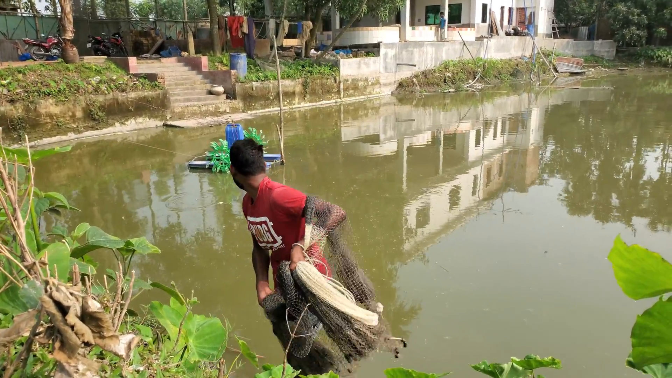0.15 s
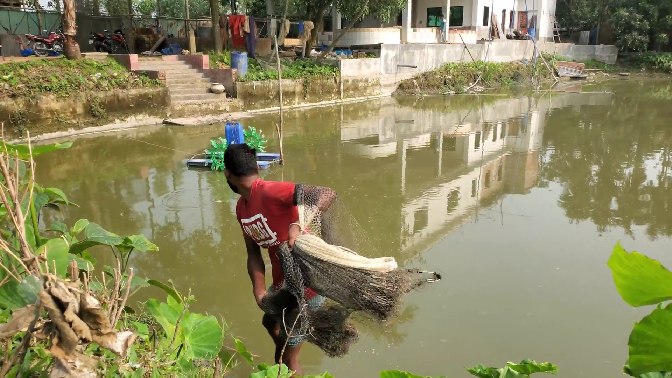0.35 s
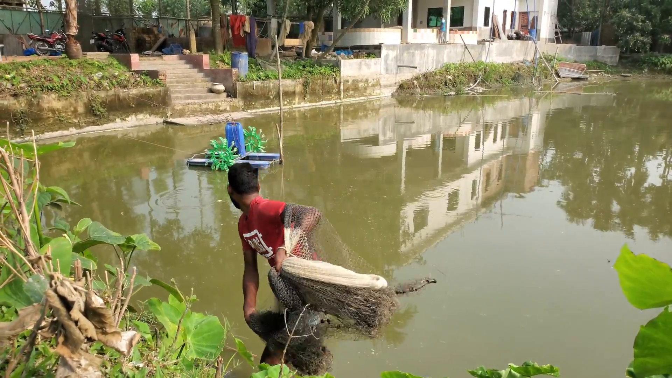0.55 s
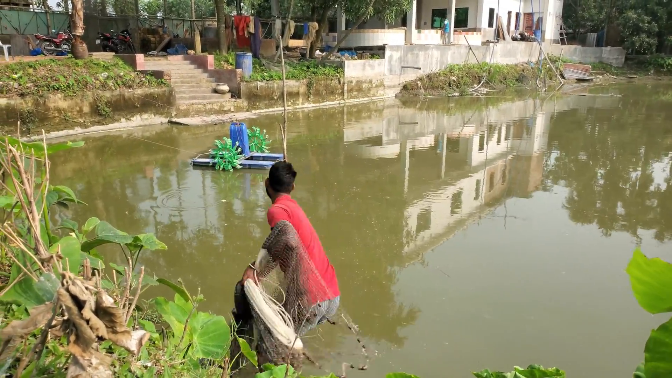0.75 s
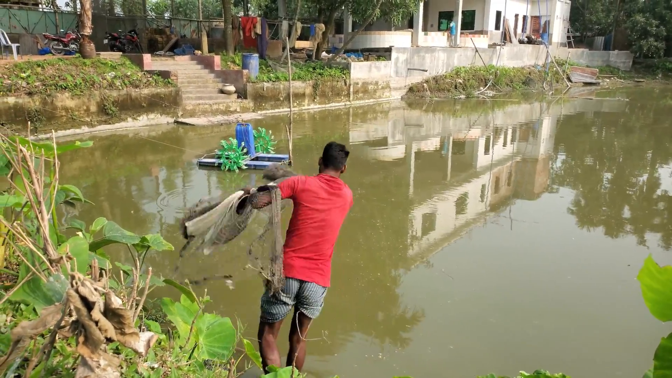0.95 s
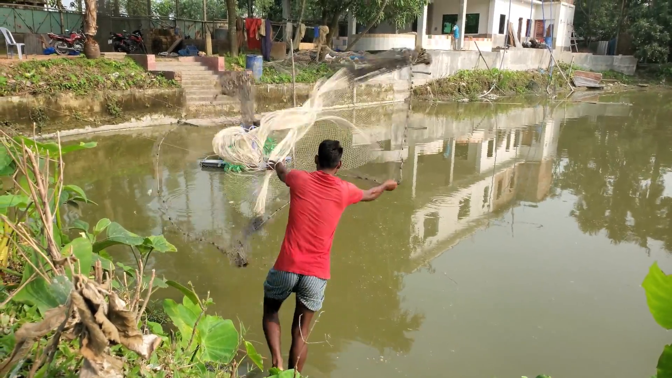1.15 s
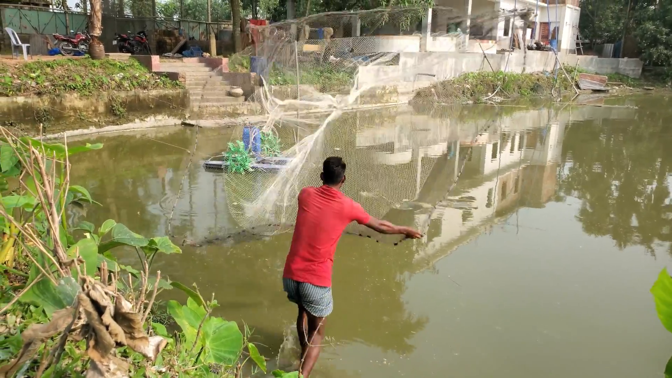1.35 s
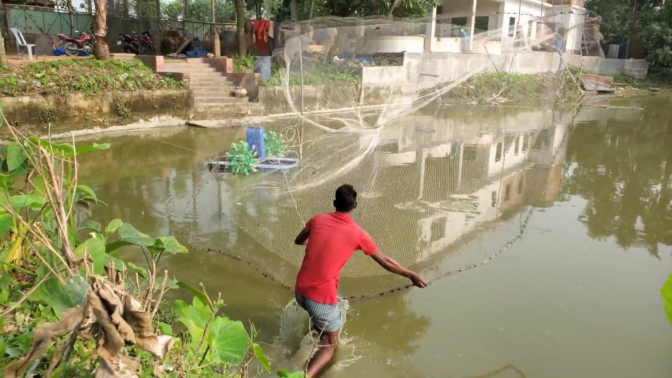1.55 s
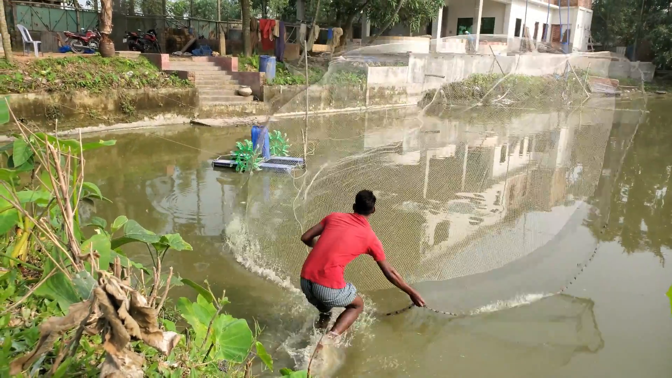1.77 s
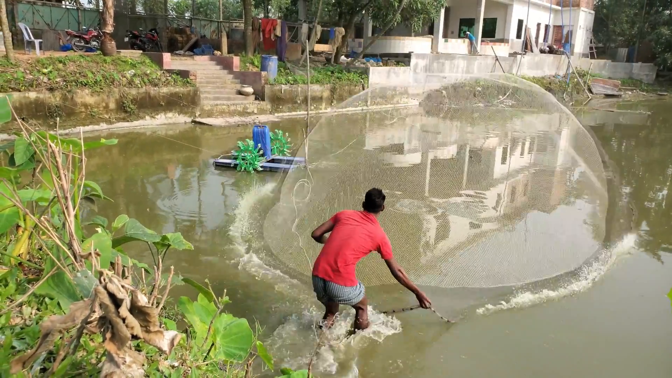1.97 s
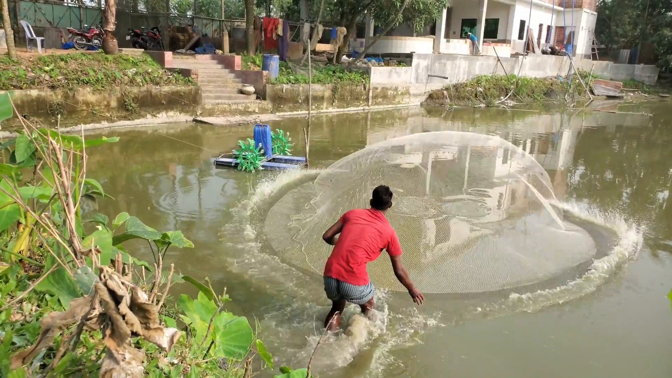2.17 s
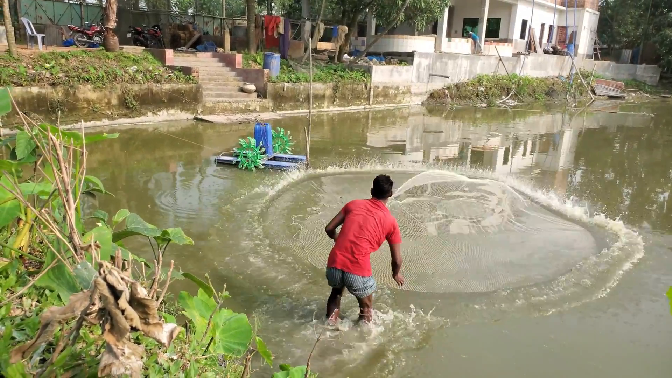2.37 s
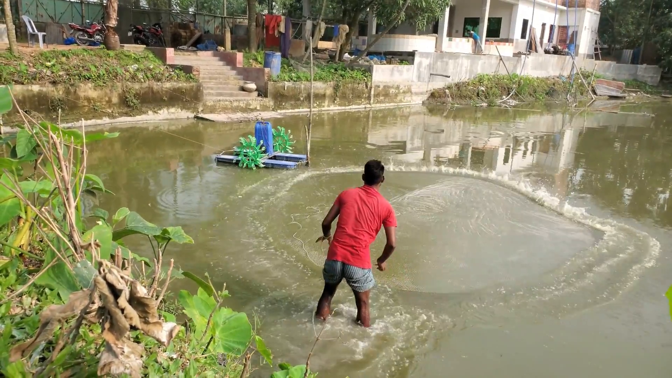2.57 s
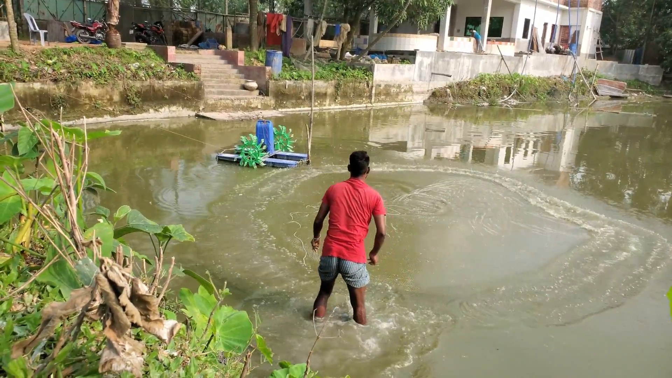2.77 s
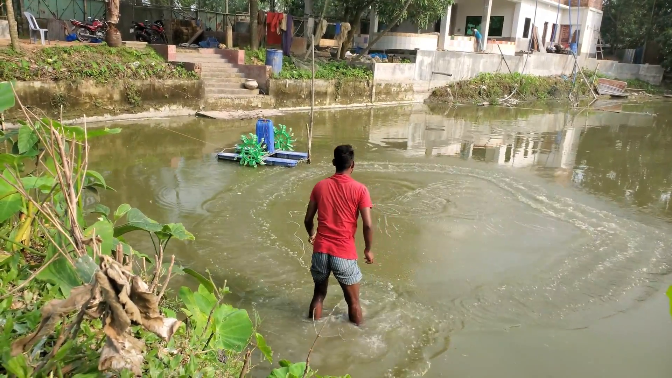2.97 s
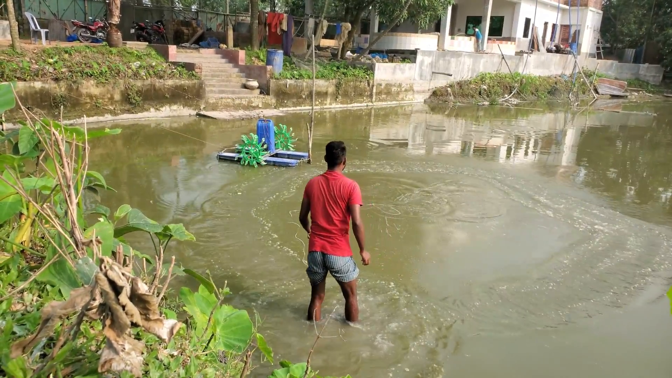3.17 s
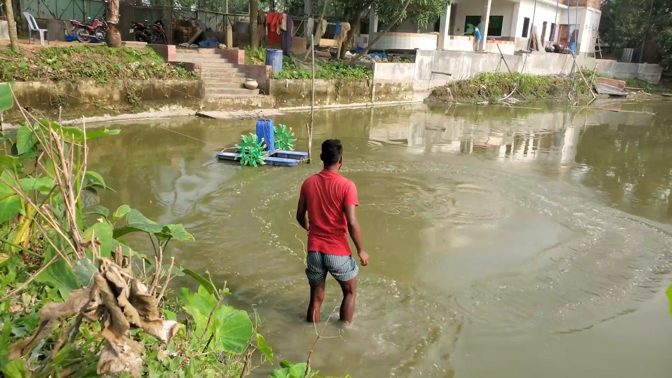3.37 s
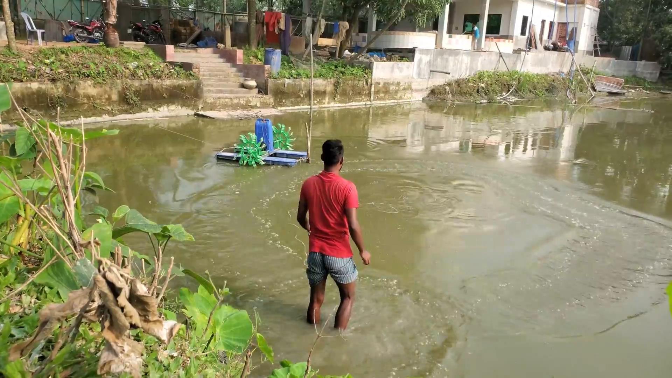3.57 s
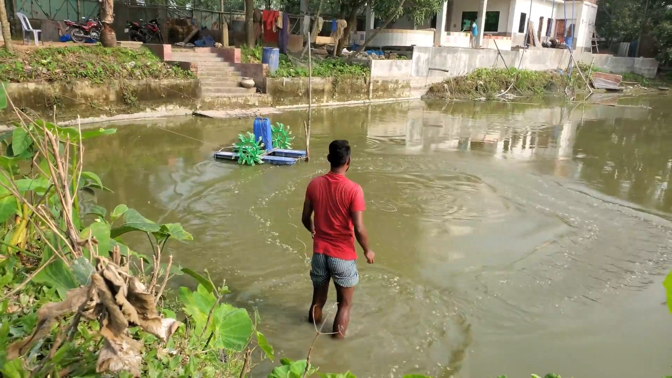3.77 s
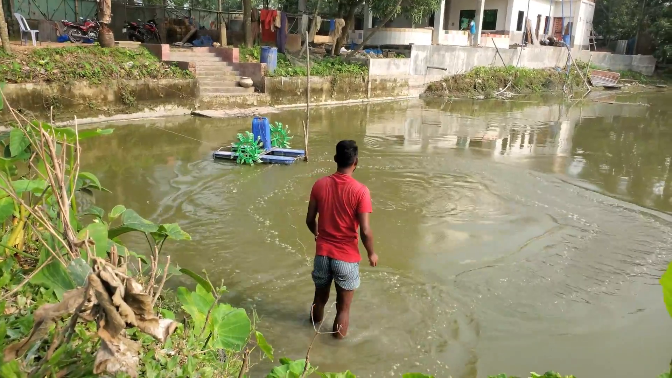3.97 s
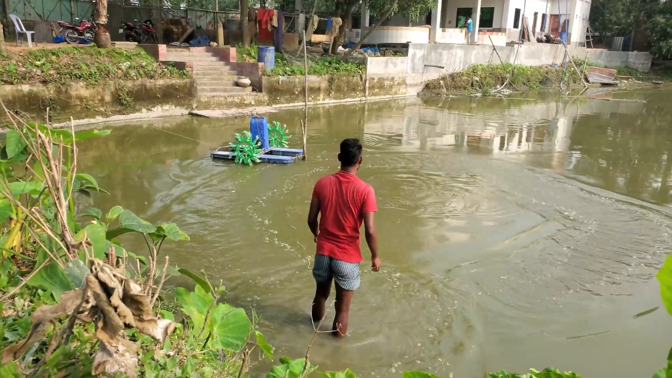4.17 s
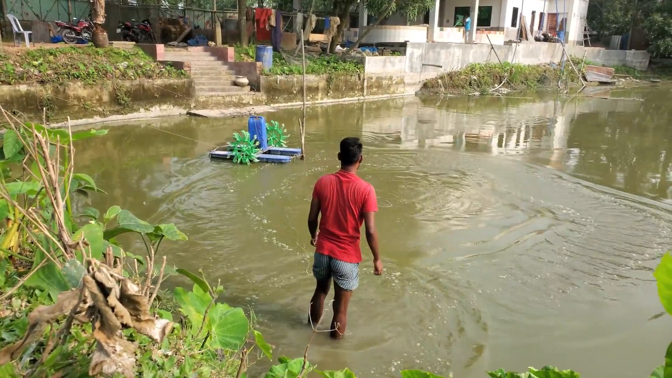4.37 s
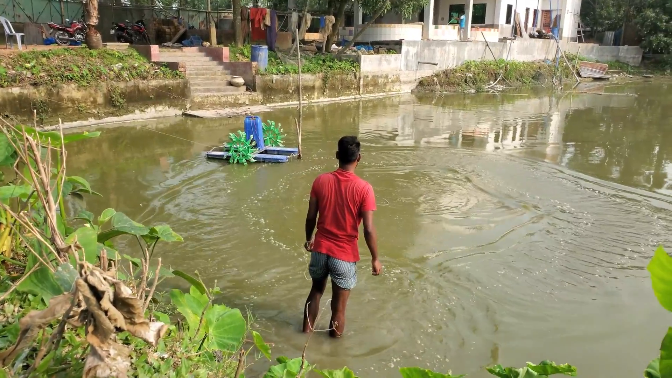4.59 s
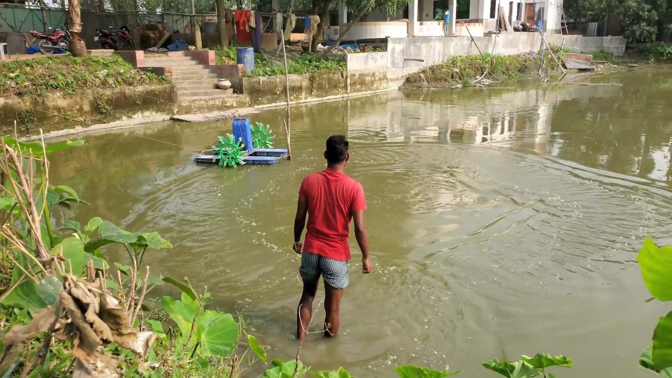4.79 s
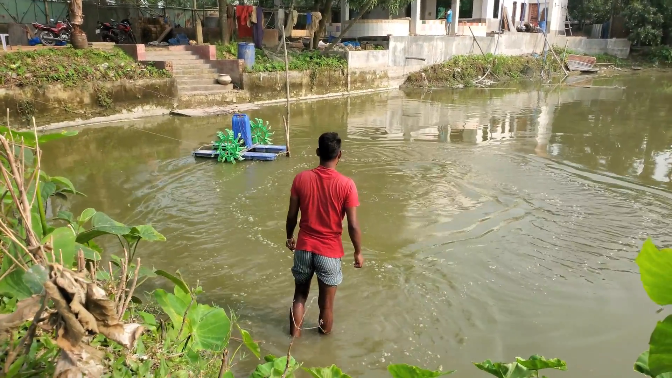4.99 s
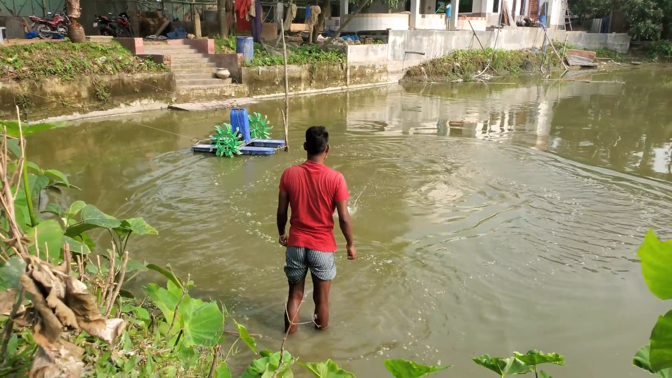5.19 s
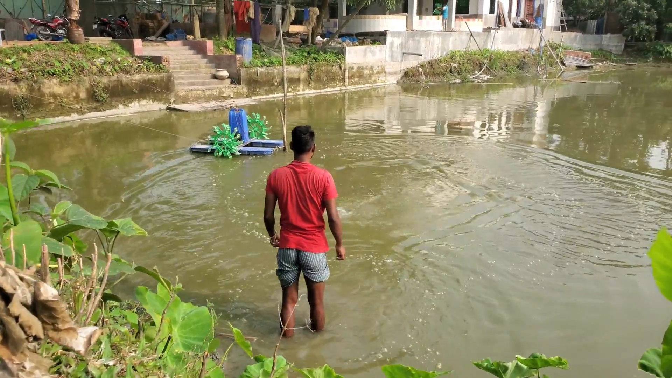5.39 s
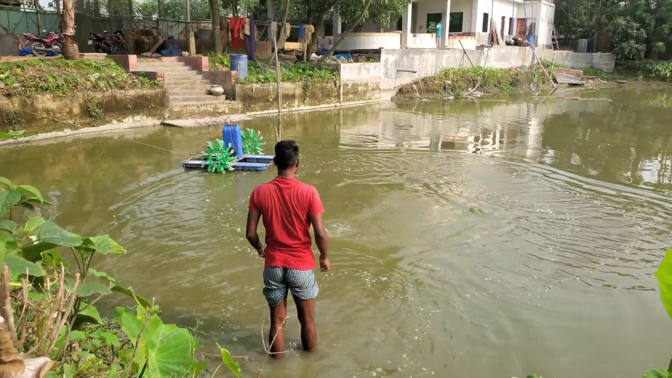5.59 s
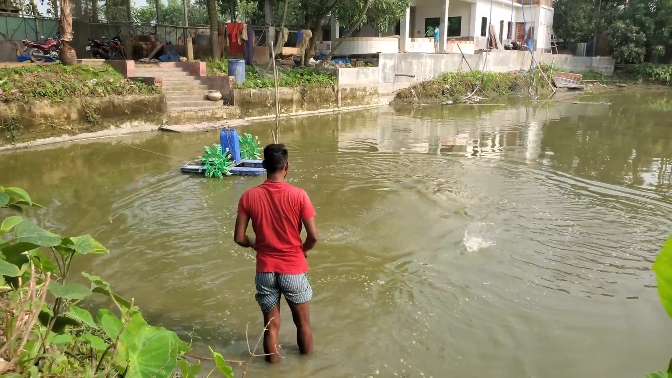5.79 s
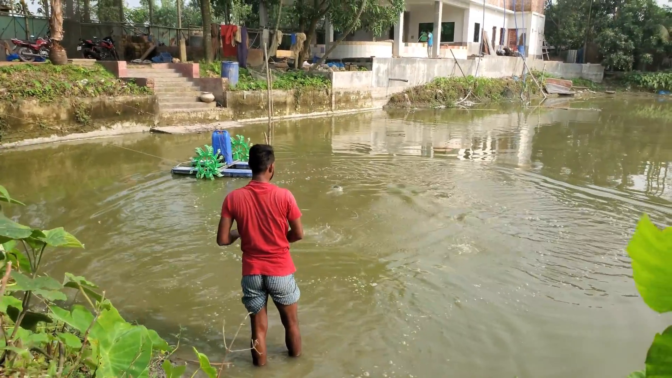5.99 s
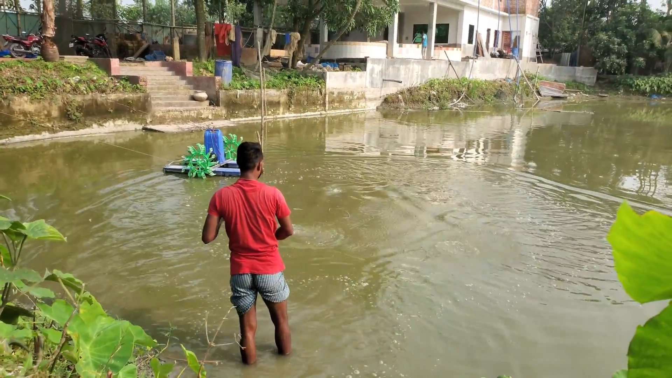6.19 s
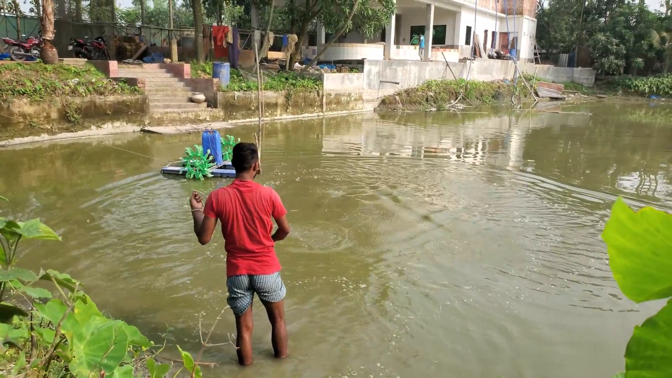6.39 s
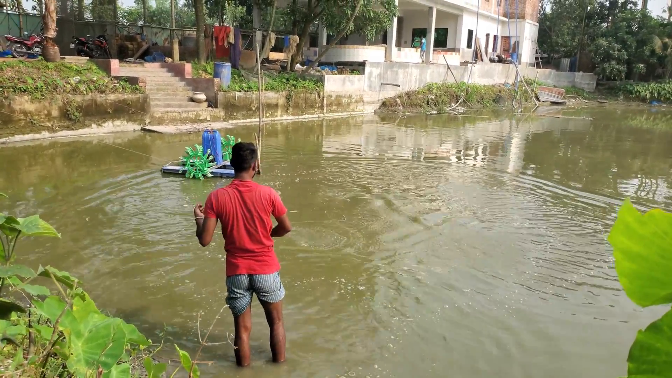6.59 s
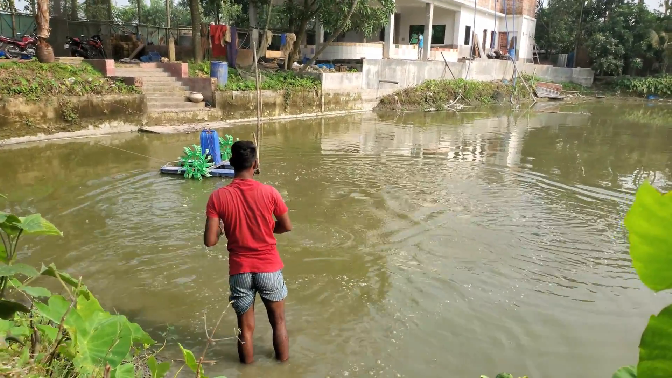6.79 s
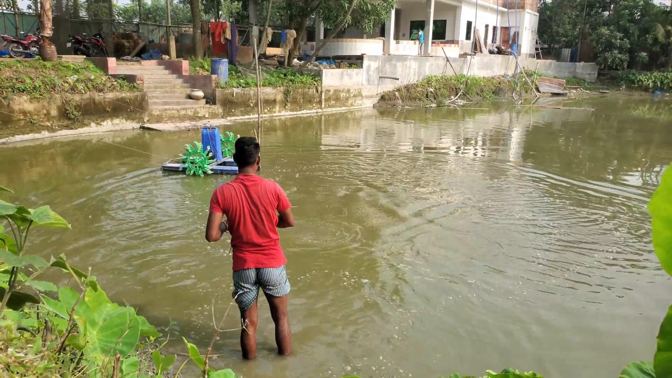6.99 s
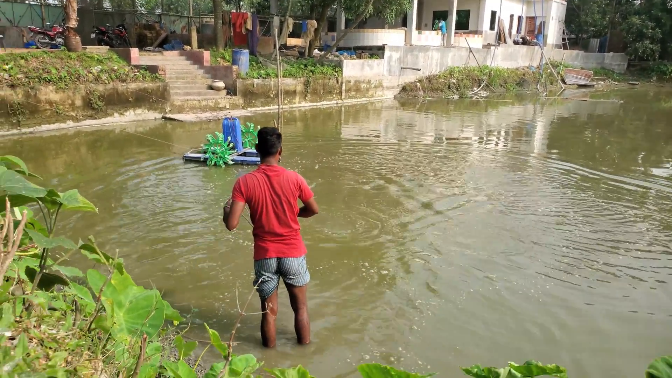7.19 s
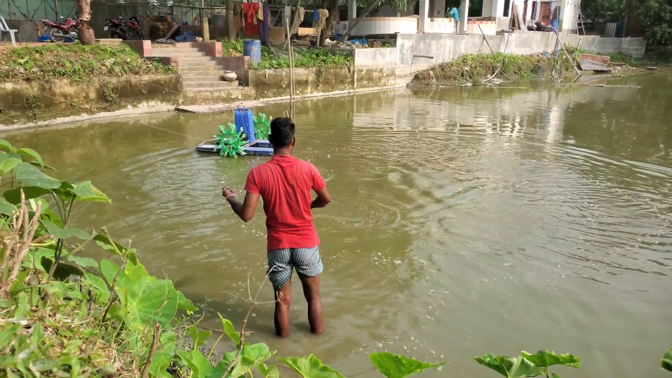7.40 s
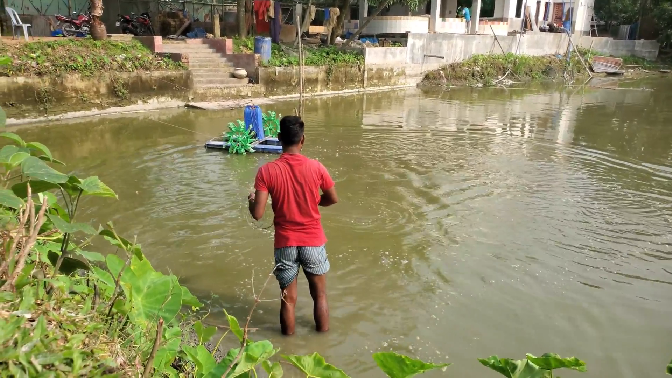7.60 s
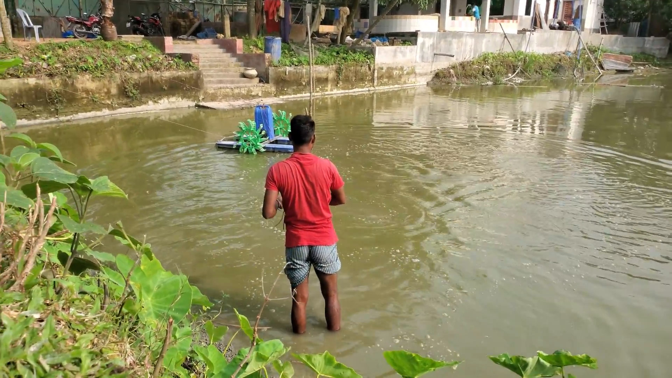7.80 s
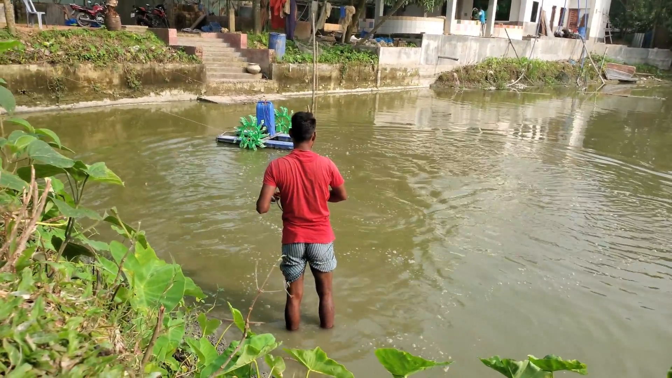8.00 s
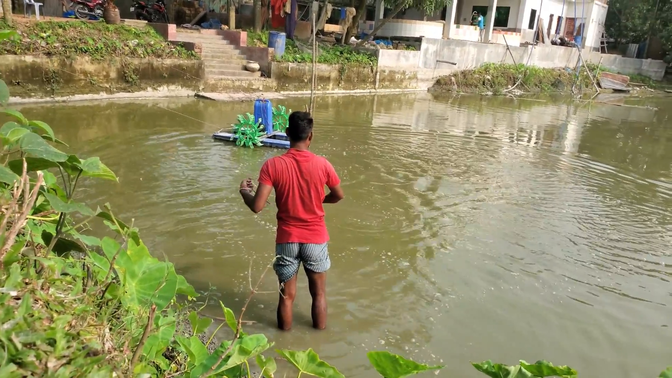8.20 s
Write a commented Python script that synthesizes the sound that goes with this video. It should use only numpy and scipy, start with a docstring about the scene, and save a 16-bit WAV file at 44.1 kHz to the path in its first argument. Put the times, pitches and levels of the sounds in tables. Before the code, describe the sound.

A hand-held stereo microphone on the bank catches mesh rustle and a sharp metallic clink, then deep watery plunges and a wide, fizzing patter as a net lands. The splash fades within about a second, leaving chirps, buzzing bird calls, low rumble and distant engine. Near the end, water sloshes lightly and heavy knocks strike the right channel.

```python
"""Small birds sing on the left and a diesel engine thuds far away, under soft outdoor hiss and rumble.
A man swings a cast net: its mesh rustles and its sinkers, short bursts of ringing modes, clink.
He lunges into the pond and the sinkers patter into the water in a wide ring: coloured impacts and bubbles.
Later the water sloshes and drips, and something taps against the right microphone of a hand-held camera:
filtered pressure spikes."""
import sys
import numpy as np
from scipy import signal
from scipy.fft import rfft, irfft, next_fast_len
from scipy.io import wavfile
from scipy.ndimage import uniform_filter1d, map_coordinates

SR = 44100
rng = np.random.default_rng(int(sys.argv[2]) if len(sys.argv) > 2 else 0)


def transcribe(signal):
    """Save signal, clipped to [-1, 1], as a 16-bit WAV file at the path in sys.argv[1]."""
    frames = np.atleast_2d(signal).T
    limited = np.clip(frames, -1, 1)
    pcm = np.round(limited * 32767).astype(np.int16)
    wavfile.write(sys.argv[1], SR, pcm)


N = 363825
TIME = np.arange(N) / SR  # s

# Every level_db in the tables is relative: panning, echoes and layer gains follow.
# left-right balance of the water: hz, left_re_right_db
WATER_BALANCE = [(200, -2), (500, 3), (1000, 8), (2500, 8), (5000, 11), (12000, 15)]
LEFT_LEAD_S, WATER_LEAD_S = .000476, .00007  # the left microphone hears a source first by this much
WHISTLE_EASE = 0.257  # a whistle glides fastest at its start


def gain_of(db):
    """Decibels to amplitude."""
    return 10 ** (np.asarray(db) / 20)


def evened(x):
    """Scales to rms 1; a pair is scaled by its middle."""
    middle = np.atleast_2d(x).mean(0)
    return x / np.sqrt(np.mean(middle ** 2) + 1e-20)


def read(points, hz):
    """Reads a spectrum on a log-frequency axis."""
    f, value = np.transpose(points)
    return np.interp(np.log(hz + 1), np.log(f), value)


def add(mix, start_s, sound):
    """Mixes a sound in at start_s."""
    part = mix[..., max(round(start_s * SR), 0):][..., :sound.shape[-1]]
    part += sound[..., :part.shape[-1]]


def pan(left_db):
    """Left and right gains whose mean is 1."""
    g = gain_of(np.atleast_1d(left_db))
    return np.array([2 * g, 2 + 0 * g]) / (1 + g)


def wander(per_s, size=N):
    """Smooth random curve of rms about 1 through per_s random points a second."""
    step = np.arange(size) * per_s / SR
    return map_coordinates(rng.standard_normal(4096), [step], order=2, mode="wrap")


def bell(peak_s, spread_s, db):
    """A smooth swell and fade around peak_s."""
    return gain_of(db) * np.exp(-.5 * ((TIME - peak_s) / spread_s) ** 2)


def colour(x, spectrum):
    """Causal minimum-phase filter with the given spectrum, so clicks keep their sharp fronts."""
    log_gain = np.log(gain_of(read(spectrum, abs(np.fft.fftfreq(4096, 1 / SR)))))
    fir = np.fft.ifft(np.exp(np.conj(signal.hilbert(log_gain)))).real
    return signal.oaconvolve(np.atleast_2d(x), fir[None], axes=1)[:, :N]


def spread(pair, balance):
    """Two unrelated signals become a wide source: alike in the bass, apart in the treble."""
    # hz, left-right coherence
    likeness = [(50, 0.91), (300, 0.67), (600, 0.64), (1200, 0.72), (3000, 0.045), (8000, 0.11),
                (16000, 0.1)]
    size = next_fast_len(N)
    hz = np.fft.rfftfreq(size, 1 / SR)
    a, b = rfft(pair, size)
    same = np.clip(read(likeness, hz), 0, 1)
    right = same * a + np.sqrt(1 - same ** 2) * b
    return irfft(np.array([a, right]) * pan(read(balance, hz)), size)[:, :N]


def from_left(pair, lead_s=LEFT_LEAD_S):
    """Sound from the left reaches the right microphone a little later."""
    return np.array([pair[0], np.pad(pair[1], (round(lead_s * SR), 0))[:N]])


def banks(x, t60_s, delay_s):
    """Scattered echoes from the banks, walls and trees: sparse random taps that build up and decay."""
    t = np.arange(SR // 2) / SR
    echoes = rng.standard_normal((2, len(t))) * (rng.random((2, len(t))) < 2500 / SR)
    echoes *= gain_of(-60 * t / t60_s) * (1 - np.exp(-(t / delay_s) ** 2))
    return signal.oaconvolve(np.atleast_2d(x), echoes / np.linalg.norm(echoes[0]), axes=1)[:, :N]


def shifting_banks(x, t60_s, delay_s, count=4):
    """Echoes of a source that keeps changing place: several echo patterns take turns."""
    turn = np.pi * np.cumsum(10 + 2 * wander(10)) / SR
    shares = np.array([np.cos(turn + np.pi * k / count) ** 2 for k in range(count)]) ** 2
    shares = shares / np.linalg.norm(shares, axis=0)
    return sum(banks(x * share, t60_s, delay_s) for share in shares)


def sinkers(level_db=-1.0, ring_t60_s=0.0034, rattle_db=-21, echo_db=-8.0):
    """Small metal weights knock: nine modes with a very short ring, and a noisy rattle of neighbours."""
    # start_s, level_db, ring_hz (the modes scatter around it)
    clinks = [(.643, -26, 7900), (0.673, -20, 8200), (.678, -20, 8000), (.683, -22, 9750),
              (.688, -28, 8000), (0.717, -23, 8400), (.949, -22, 8330), (.966, -32, 9000),
              (0.9732, -21.5, 8500), (1.051, -23.5, 7600), (1.07, -23, 9000), (1.124, -8.5, 8330),
              (1.127, -17, 9300), (1.134, -14, 10000), (1.158, -20, 7800), (1.169, -19, 8000),
              (1.175, -22, 7450), (1.1987, -14.5, 6940), (1.224, -19, 6250), (1.32, -21, 9070),
              (1.409, -20, 8600), (1.429, -21, 8800), (1.501, -18, 7400), (1.598, -30, 7700),
              (1.628, -30, 9500), (1.638, -20, 9700), (1.646, -21, 9500)]
    out, t = np.zeros(N), np.arange(SR // 20) / SR
    for start_s, db, hz in clinks:
        modes_hz = hz * rng.uniform(0.71, 1.74, (9, 1))
        ring = np.sin(2 * np.pi * modes_hz * t).sum(0) * gain_of(-60 * t / ring_t60_s)
        rattle = rng.standard_normal(len(t)) ** 3 / 4 * gain_of(rattle_db - 60 * t / 0.033)
        add(out, start_s, gain_of(db + level_db) * (ring / abs(ring).max() + rattle))
    out = colour(out, [(800, -8.5), (3000, -9), (5500, -3.0), (9000, -1.0), (16000, -7.5)])
    return out * pan(21) + gain_of(echo_db) * banks(out, t60_s=0.62, delay_s=0.0031) * pan(11)


def surges(rows):
    """Strength of churning, splashing and spray: each surge rises and dies away exponentially."""
    power = np.zeros((3, N))
    for peak_s, rise_s, fall_s, *db in rows:
        decay = np.maximum((peak_s - TIME) / rise_s, (TIME - peak_s) / fall_s)
        power += (gain_of(db)[:, None] * np.exp(-np.minimum(decay, 20))) ** 2
    return np.sqrt(power)


def landing():
    """Strength of churning, splashing and spray as the ring of sinkers lands in one swell."""
    # rows for churning, splashing, spray: peak_s, spread_s, level_db
    swells = [(2.19, 0.23, -35), (2.244, 0.37, -37), (2.134, 0.41, -49)]
    touch_s, touch_rise_s = 1.8, 0.0089  # the first sinkers reach the water
    return np.array([bell(*row) for row in swells]) * np.clip((TIME - touch_s) / touch_rise_s, 0, 1)


def drops(per_s, size_db):
    """Two unrelated trains of impacts, most small and a few large."""
    sizes = gain_of(size_db * np.minimum(rng.exponential(1, (2, N)), 4))
    return sizes * rng.choice([-1, 1], (2, N)) * (rng.random((2, N)) < per_s / SR)


def bubble(start_hz, length_s, rise):
    """A trapped bubble rings and climbs in pitch as it nears the surface."""
    t = np.arange(0, 3 * length_s, 1 / SR)
    ring = np.sin(2 * np.pi * start_hz * t * (1 + rise * t / length_s))
    return ring * np.exp(-2 * t / length_s) * (1 - np.exp(-t * start_hz * 2))


def fizz(per_s, low_hz, high_hz, cycles, size_db):
    """A cloud of bubbles, each with its own pitch, strength and length."""
    out = np.zeros((2, N))
    for side, place, size, pitch, life in rng.random((8000, 5))[:int(per_s * N / SR)]:
        hz = low_hz * (high_hz / low_hz) ** pitch
        strength = hz ** 0.28 * gain_of(-size_db * np.log(size + 0.063))
        add(out[int(side * 2)], place * N / SR, strength * bubble(hz, (.5 + life) * cycles / hz, rise=0.047))
    return evened(out)


def water(levels, density_per_s, churn_db, splash_db, spray_db, bubble_db, clump_db=0.71, own_clump_db=1.22):
    """Churning air pockets, splashing drops with their bubbles, and fine spray."""
    # spectra of the three layers: hz, level_db
    churn_spectrum, splash_spectrum, spray_spectrum = [(100, -22), (190, 1), (260, -6), (360, -5),
                                                       (500, 5.5), (700, -14), (1000, -11), (2000, -27),
                                                       (6000, -37)], [(300, -22.5), (700, 1), (1100, 0.5),
                                                                      (2200, -0.5), (3500, -4),
                                                                      (5500, -9.5), (8000, -33),
                                                                      (16000, -40)], [(2000, -15.5),
                                                                                      (4500, 2), (7000, 1),
                                                                                      (10000, -2.5),
                                                                                      (13000, -5),
                                                                                      (16000, -6)]
    pockets = fizz(density_per_s * .06, 222.7, 820, cycles=6.5, size_db=4.0)
    churn = evened(colour(drops(density_per_s * 0.22, size_db=1.0), churn_spectrum))
    churn = evened(churn + gain_of(2.0) * pockets)
    splash = evened(colour(drops(density_per_s * .5, size_db=3.5), splash_spectrum))
    bubbles = fizz(density_per_s * .12, 602.3, 4990, cycles=18.8, size_db=5.5)
    splash = evened(splash + gain_of(bubble_db) * bubbles)
    spray = evened(colour(drops(density_per_s * 2.3, size_db=4.0), spray_spectrum))
    layers = zip(levels, (churn_db, splash_db, spray_db), (churn, splash, spray))
    out = sum(level * gain_of(db + own_clump_db * wander(45)) * sound for level, db, sound in layers)
    out = out * gain_of(clump_db * wander(110))  # sinkers and drops land in clumps
    echo = gain_of(-7.5) * shifting_banks(out, t60_s=0.08, delay_s=0.00062)
    return from_left(spread(out + echo, WATER_BALANCE), WATER_LEAD_S)


def slaps(level_db=-7.0, echo_db=-11.0):
    """A drop or a small wave smacks the surface: a sharp front and a noise burst that dies at once."""
    # start_s, level_db, centre_hz, fall_s
    slap_rows = [(1.472, -17, 1100, .004), (1.721, -26, 1520, 0.0045), (1.805, -22.5, 9000, .001),
                 (1.884, -25, 2205, 0.0032), (2.006, -25, 6500, 0.00081), (2.015, -27, 3500, .001),
                 (2.055, -21, 1800, .003), (2.177, -15, 7000, 0.0011), (2.226, -21, 1200, .004),
                 (2.284, -24, 1600, .004), (2.345, -23, 2000, .003), (2.412, -24, 1410, .004),
                 (2.469, -26, 7000, .001), (2.521, -37, 7000, .001), (2.77, -30, 9000, .001),
                 (2.849, -39, 8520, .001), (3.055, -47, 8000, 0.0015), (3.238, -48, 9000, 0.0022),
                 (5.787, -32, 5983, .002), (5.801, -30, 8000, .002), (5.858, -27, 2000, 0.0015),
                 (6.001, -40, 9000, .001), (6.406, -44, 8500, .001), (7.199, -34.5, 2500, 0.0032),
                 (7.238, -38, 2500, .002), (7.469, -44, 6000, .001)]
    half_width = 2 ** 0.39  # the band reaches 0.39 octaves to each side
    out, t = np.zeros(N), np.arange(SR // 25) / SR
    for start_s, db, hz, fall_s in slap_rows:
        edges_hz = np.clip([hz / half_width, hz * half_width], 20, SR / 2 - 20)
        band = signal.butter(1, edges_hz, "bandpass", fs=SR)
        burst = signal.lfilter(*band, rng.standard_normal(len(t)) * np.exp(-t / fall_s))
        add(out, start_s, gain_of(db + level_db) * burst / abs(burst).max())
    echo = gain_of(echo_db) * banks(out, t60_s=.12, delay_s=.003) * pan(9.)
    return from_left(out * pan(11.5) + echo, WATER_LEAD_S)


def gulps(scatter=0.268, cluster_db=-6, count=6):
    """Air closes under legs, net and ripples: a large pocket rings and breaks into smaller bubbles."""
    # start_s, level_db, start_hz, length_s
    gulp_rows = [(0.719, -35.5, 439, 0.034), (0.734, -41.5, 800, 0.012), (1.138, -37, 800, 0.0072),
                 (1.336, -29.5, 527, 0.033), (1.378, -24.5, 446, 0.027), (1.47, -22.5, 384, 0.017),
                 (1.509, -19, 380, 0.027), (1.522, -26.5, 210, 0.0247), (1.53, -20, 439, 0.029),
                 (1.663, -31, 479.5, 0.021), (1.734, -27.5, 404, 0.028), (1.885, -29, 475, 0.017),
                 (1.922, -20.5, 435, 0.034), (1.94, -30, 328, 0.02), (1.963, -21.5, 444, 0.023),
                 (1.983, -25, 354, .02), (2.019, -22, 496, 0.022), (2.054, -34, 520, 0.018),
                 (2.082, -37, 490, 0.017), (2.114, -30, 270, 0.02), (2.145, -25.5, 908, 0.014),
                 (2.183, -35, 395, 0.025), (2.22, -22, 491, 0.014), (2.278, -23, 510, 0.013),
                 (2.318, -29, 473, .015), (2.37, -33, 410, 0.024), (2.412, -25, 503, 0.018),
                 (2.497, -33.5, 472, 0.016), (2.624, -29.5, 484, 0.018), (2.76, -35, 506, 0.015),
                 (5.072, -37, 929.6, 0.013), (5.138, -38, 774, 0.015), (5.164, -31, 747, 0.017),
                 (5.17, -35, 414, 0.015), (5.471, -41.5, 815, 0.019), (5.795, -30, 1240, 0.0062),
                 (5.869, -34, 820, 0.0053), (5.915, -28.5, 875, 0.0045), (6.143, -30.5, 383, 0.022),
                 (6.465, -35.5, 375, 0.011), (6.51, -41, 419.3, 0.011), (7.249, -31.5, 430, 0.016),
                 (7.501, -38.5, 1090, .012)]
    out = np.zeros(N)
    for start_s, db, hz, length_s in gulp_rows:
        main = bubble(hz, length_s, rise=0.054)
        main *= 1 - np.exp(-np.arange(len(main)) / SR / (0.058 * length_s))
        add(out, start_s, gain_of(db - 4.5) * main / abs(main).max())
        for late, size in rng.random((count, 2)):
            small_hz = hz * np.exp(scatter * (3.87 * size - 1.9))
            small = bubble(small_hz, 3.0 / small_hz, rise=0.15)
            add(out, start_s + late * length_s, gain_of(db + cluster_db) * small)
    return out * pan(6.3) + gain_of(-10.5) * banks(out, t60_s=1.0, delay_s=0.0082)


def mesh(grain_db=3):
    """The wet net rustles as it is swung back and let go: dense small impacts in smooth swells."""
    # peak_s, spread_s, level_db
    swings = [(.15, 0.12, -51), (.45, 0.079, -51.5), (.66, 0.082, -53.5), (1.13, 0.59, -57)]
    spectrum = [(300, -30), (1200, -30), (2200, -3.5), (4200, 5.0), (6500, -19.0), (10000, -18.5), (16000, -28)]
    rustle = colour(drops(2500, size_db=grain_db), spectrum)
    return evened(spread(rustle, WATER_BALANCE)) * np.linalg.norm([bell(*row) for row in swings], axis=0)


def drips(db=-70, from_s=4.5):
    """Stray drops and small bubbles plink now and then from 4.5 s on."""
    plinks = fizz(23, 584, 1760, cycles=6.5, size_db=8.5)
    plinks = plinks + gain_of(-2.0) * banks(plinks, t60_s=0.21, delay_s=0.0042)
    return gain_of(db) * evened(spread(plinks, WATER_BALANCE)) * (TIME > from_s)


def taps(level_db=0., left_lag_s=.00095):
    """Each tap on the right microphone is a pressure spike that swings back through the camera body."""
    # start_s, level_db, brightness_hz, left_share (what leaks to the left microphone)
    tap_rows = [(4.758, -21.5, 384, 0.12), (6.011, -0.5, 2320, 0.073), (6.058, -4, 814, 0.055),
                (6.09, -12, 480, 0.038), (6.1115, -16.5, 608, 0.064), (6.1422, -13, 850, 0.11),
                (6.246, -25.5, 695, 0.12), (7.935, -27, 826, 0.082)]
    # thump of the camera body: hz, level_db
    body_spectrum = [(20, -53), (45, -39), (85, 6.5), (130, 3.5), (175, 7.5), (250, 4.5), (500, 0),
                     (1000, -4.5), (2500, -14.5), (6000, -29), (11000, -9), (16000, -9)]
    out, t = np.zeros((2, N)), np.arange(SR // 100) / SR
    for start_s, db, hz, left_share in tap_rows:
        push = t * np.exp(-2 * np.pi * hz * t) * np.sinc(hz * t)
        thump = colour(push, body_spectrum)[0]
        thump = gain_of(db + level_db) * thump / abs(thump).max()
        add(out[0], start_s + left_lag_s, left_share * thump)
        add(out[1], start_s, thump)
    return out


def whistle(hz, shape, db, waver=.011, flutter_db=3.5):
    """One bird voice: a sine unsteady in pitch and strength, with faint overtones."""
    phase = 2 * np.pi * np.cumsum(hz * (1 + waver * wander(498.0, size=len(hz)))) / SR
    shape = shape * gain_of(flutter_db * wander(83.6, size=len(hz)))
    tone = np.sin(phase) + gain_of(-23) * np.sin(2 * phase) + gain_of(-29) * np.sin(3 * phase)
    return gain_of(db) * evened(shape * tone)


def note(length_s, db, hz, octaves, ease, depth=0, per_s=0, swell_db=0, pulsing=0.42, taper=0.37):
    """One note glides through its middle pitch; a warble is loudest at the foot of each swing."""
    t = np.arange(0, length_s, 1 / SR)
    u = t / length_s - .5
    warble = np.sin(2 * np.pi * per_s * t + 0.257 * wander(59.7, size=len(t))) * (depth > 0)
    shape = signal.windows.tukey(len(t), taper) * (1 - pulsing * warble) * gain_of(swell_db * u)
    return whistle(hz * (2 ** (octaves * u * (1 - 2 * ease * u)) + depth * warble), shape, db)


def chip(crest_s, db, crest_hz, rise_s, fall_s):
    """A chip hooks softly up to its crest, then swells as it falls ever more steeply; gives start, sound."""
    hook_octaves, drop_octaves, bend, swell_db = 0.23, .85, 1.9, 6
    t = np.arange(-rise_s, fall_s, 1 / SR)
    octaves = np.where(t < 0, hook_octaves * (t / rise_s) ** 2, drop_octaves * (abs(t) / fall_s) ** bend)
    shape = signal.windows.tukey(len(t), .35) * gain_of(swell_db * t / fall_s)
    return crest_s - rise_s, whistle(crest_hz * 2 ** -octaves, shape, db)


def slur(length_s, db, top_hz, bottom_hz, steepest):
    """One unbroken whistle slides down an S-curve, loudest just after the steepest part."""
    bend_s, swell_s, peak_s = 0.019, 0.013, 0.023
    t = np.arange(0, length_s, 1 / SR) - steepest * length_s
    fallen = 1 / (1 + np.exp(-t / bend_s))
    swell = 0.96 * (1 + fallen) / 2 + np.exp(-((t - peak_s) / swell_s) ** 2)
    shape = swell * signal.windows.tukey(len(t), .25)
    return whistle(top_hz + (bottom_hz - top_hz) * fallen, shape, db, waver=0.017)


def birds(whistle_db=-2.5, buzz_db=-5.5, rasp_db=-4.5, quaver_db=0.0, leaves_db=-8, echo_db=-5.5):
    """Whistles, buzzes, rasps, quavers, chips, slurs and pips, scattered by leaves and banks."""
    # plain whistles: start_s, length_s, level_db, middle_hz, glide_octaves
    whistle_rows = [(.092, 0.033, -50, 4400, -0.35), (0.118, .02, -44.5, 3100, -.6),
                    (0.14, 0.025, -35, 3680, 0.023), (0.148, .03, -52, 4800, -0.57),
                    (0.237, 0.026, -52, 4000, -0.73), (.31, .065, -58, 3250, -0.27),
                    (0.393, 0.1, -46, 3330, 0.7), (0.426, 0.057, -49.5, 4230, 0.1),
                    (0.606, 0.028, -52, 2750, -0.64), (2.761, 0.011, -36.5, 3610, -0.023),
                    (3.603, 0.098, -47, 3260, 0.75), (3.875, 0.033, -46.5, 3470, -0.16),
                    (3.877, 0.037, -53.5, 2920, 0.098), (4.005, 0.039, -56.5, 3760, 0.31),
                    (4.038, .018, -52, 3440, -0.41), (4.18, .018, -60.5, 6700, 0.06),
                    (4.199, 0.046, -54.5, 3950, -0.38), (4.238, 0.028, -49, 3500, .1),
                    (4.546, 0.02, -47.5, 3560, -0.16), (4.586, 0.021, -43, 3545, -0.17),
                    (4.627, 0.033, -41.5, 3540, -0.041), (5.1, 0.023, -50, 4500, -0.015),
                    (5.117, .016, -53, 3600, -.6), (5.16, .018, -49.5, 3950, -0.65),
                    (5.191, .02, -56, 5650, -0.18), (5.206, 0.017, -48.5, 4150, -0.91),
                    (5.24, .012, -54, 4700, -.55), (5.25, 0.011, -50, 4700, -0.64),
                    (5.256, 0.023, -44.5, 3380, -0.052), (5.29, 0.011, -48.5, 4400, -0.6),
                    (5.297, 0.024, -46, 3350, -0.27), (5.326, 0.015, -59, 4500, -.5),
                    (5.339, .016, -51, 3950, -0.66), (5.354, 0.01, -59, 4900, -.5),
                    (5.386, 0.019, -53, 4050, -0.64), (5.418, .011, -55, 4500, -0.56),
                    (5.457, 0.085, -48.5, 3330, 0.52), (5.617, .03, -55, 5430, 0.063),
                    (6.172, 0.073, -50, 3700, 0.13), (6.542, 0.066, -43, 3035, -0.051),
                    (6.654, 0.02, -51, 3330, 0.038), (7.284, 0.039, -48.5, 3650, 0.2),
                    (7.392, 0.025, -44.5, 3190, -0.22), (7.868, 0.023, -45, 3104, -0.14),
                    (8.079, 0.078, -46.5, 3066, -0.59)]
    # rising buzzes: start_s, length_s, level_db, middle_hz, glide_octaves
    buzz_rows = [(1.674, 0.175, -39, 3630, 0.4), (3.146, .16, -42, 3776, 0.55),
                 (4.61, 0.17, -40, 3580, 0.47), (5.553, 0.17, -43.5, 3517, 0.53),
                 (6.151, 0.13, -48, 3587, 0.126), (7.149, 0.11, -52.5, 4150, 0.13)]
    # short rasps that end in a high flick: start_s, length_s, level_db, middle_hz, sweeps_per_s, flick_hz
    rasp_rows = [(0, 0.042, -40.5, 4300, 110, 5450), (4.098, 0.052, -48.5, 4610, 110, 6700),
                 (6.676, 0.038, -45, 4820, 93, 7330), (7.313, 0.041, -44, 5144, 78, 7520),
                 (7.953, 0.066, -50, 5490, 63.4, 7000)]
    # slow quavers: start_s, length_s, level_db, middle_hz, warbles_per_s
    quaver_rows = [(0.187, 0.12, -48, 3630, 35), (0.542, 0.1, -49.5, 3590, 73),
                   (0.99, 0.18, -52.5, 3230, 41), (1.93, 0.18, -45, 3600, 37),
                   (3.375, 0.14, -44.5, 3500, 33), (4.856, 0.136, -46.5, 3426, 32),
                   (5.679, 0.14, -50.5, 3566, 33), (5.815, 0.16, -48, 3390, 31)]
    # arched chips: crest_s, level_db, crest_hz, rise_s, fall_s
    chip_rows = [(2.943, -60, 4700, 0.0029, 0.02), (3.011, -58, 4730, 0.0028, 0.021),
                 (3.344, -55.5, 6480, 0.0096, .018), (3.362, -48.5, 5760, .006, 0.033),
                 (3.411, -54, 6270, .008, 0.028), (3.452, -54, 6500, 0.01, .024),
                 (3.627, -57, 5294, 0.0033, 0.026), (3.682, -55, 5700, 0.013, 0.02),
                 (3.736, -58.5, 5700, 0.0093, 0.031), (3.78, -53, 5540, 0.011, 0.024),
                 (3.797, -53, 5520, 0.0028, 0.019), (3.82, -59, 6050, 0.0055, 0.02),
                 (3.853, -57, 5800, 0.0024, 0.014), (3.866, -63, 6200, 0.0068, 0.022),
                 (3.893, -65, 5670, .003, 0.015), (3.909, -59, 5660, 0.004, 0.022),
                 (4.528, -59, 5630, .01, 0.034), (4.574, -67, 6260, 0.0067, 0.021),
                 (4.615, -60, 6400, 0.0086, 0.025)]
    # long falling slurs: start_s, length_s, level_db, top_hz, bottom_hz, steepest (share of length)
    slur_rows = [(2.633, 0.26, -50.5, 6730, 3703, 0.49), (6.423, 0.16, -53.5, 6400, 3520, .39)]
    # a run of short pips: start_s, level_db
    pip_rows = [(7.539, -56), (7.565, -62), (7.588, -62), (7.613, -47), (7.637, -52), (7.66, -49),
                (7.682, -51), (7.958, -59), (7.987, -50.5)]
    flick_at, flick_s, flick_db, flick_octaves = 0.61, 0.0202, -11, 0.2  # flick_at: share of the rasp
    song = np.zeros(N)
    for start_s, length_s, db, hz, octaves in whistle_rows:
        add(song, start_s, note(length_s, db + whistle_db, hz, octaves, WHISTLE_EASE, taper=0.47))
    for start_s, length_s, db, hz, octaves in buzz_rows:
        # negative ease: climbs ever faster; depth is a share of the pitch
        buzz = note(length_s, db + buzz_db, hz, octaves, ease=-0.41, depth=0.099, per_s=185, swell_db=7.5)
        add(song, start_s, buzz)
    for start_s, length_s, db, hz, per_s, flick_hz in rasp_rows:
        add(song, start_s, note(length_s, db + rasp_db, hz, octaves=0.132, ease=0, depth=0.188, per_s=per_s))
        flick = note(flick_s, db + rasp_db + flick_db, flick_hz, flick_octaves, WHISTLE_EASE)
        add(song, start_s + flick_at * length_s, flick)
    for start_s, length_s, db, hz, per_s in quaver_rows:
        quaver = note(length_s, db + quaver_db, hz, octaves=-0.0284, ease=0, depth=0.0818, per_s=per_s,
                      pulsing=0.065, taper=0.096)
        add(song, start_s, quaver)
    for row in chip_rows:
        add(song, *chip(*row))
    for start_s, *row in slur_rows:
        add(song, start_s, slur(*row))
    for start_s, db in pip_rows:
        add(song, start_s, note(0.0126, db, 3055, octaves=-0.23, ease=0))
    near = song + gain_of(leaves_db) * banks(song, t60_s=.1, delay_s=.003)
    echo = gain_of(echo_db) * banks(song, t60_s=0.39, delay_s=0.017) * pan(11.3)
    return from_left(near * pan(10.8)) + echo


def chatter(length_s, db, hz, octaves, sweep):
    """Very fast sweeps up and down, uneven in pitch and strength, blur into a raspy band."""
    per_s, scatter, swell_db = 120, 0.061, 2.5  # scatter: share of the pitch
    t = np.arange(0, length_s, 1 / SR)
    zigzag = signal.sawtooth(2 * np.pi * (per_s * t + .2 * wander(60, size=len(t))), .3)
    glide = 2 ** (octaves * (t / length_s - .5))
    pitch_hz = hz * (glide + sweep * zigzag + scatter * wander(200, size=len(t)))
    shape = signal.windows.tukey(len(t), .4) * gain_of(swell_db * wander(35.2, size=len(t)))
    return whistle(pitch_hz, shape, db)


def hidden_birds(direct_db=-8, scattered_db=-1):
    """Thin, slightly trembling whistles and hazy chatter from deep in the trees, more scattered than direct."""
    # thin whistles: start_s, length_s, level_db, middle_hz, glide_octaves
    thin_rows = [(0.173, 0.05, -50.5, 6140, -0.3), (0.219, 0.052, -50, 6190, -0.31),
                 (0.407, 0.087, -57, 5880, -0.018), (0.588, 0.035, -57, 6220, -0.068),
                 (0.63, 0.032, -49.5, 6270, -0.19), (0.783, 0.073, -56, 5680, -0.083),
                 (1.008, 0.041, -52, 6180, -0.19), (1.06, 0.056, -52, 6120, -0.12),
                 (1.234, .07, -57, 5780, -0.013), (6.736, 0.048, -53.5, 2380, 0.041),
                 (6.782, 0.06, -55, 2580, 0.0783), (6.915, .035, -59, 2870, .05),
                 (7.152, .14, -52.5, 3033, -0.046), (8.024, 0.052, -51.5, 3300, -.1),
                 (8.139, .04, -59, 2640, 0.031)]
    # chatter: start_s, length_s, level_db, middle_hz, glide_octaves, sweep (share of the pitch)
    chatter_rows = [(0.559, 0.2, -52, 3520, -0.12, 0.12), (3.341, .14, -62, 5050, -0.038, 0.17),
                    (3.75, 0.17, -58.5, 4390, -0.11, 0.28), (4.085, 0.062, -50, 4300, 0.216, 0.13),
                    (4.307, 0.16, -52, 3410, 0.11, 0.27), (4.762, 0.074, -52, 4250, 0.096, 0.08),
                    (4.79, 0.25, -56.5, 4700, .38, 0.043), (5.196, 0.17, -55.5, 4130, 0.044, 0.37),
                    (7.53, .22, -54.5, 3880, 0.17, 0.16), (7.62, 0.27, -55.5, 4200, 0.12, 0.193)]
    song = np.zeros(N)
    for start_s, length_s, db, hz, octaves in thin_rows:
        add(song, start_s, note(length_s, db, hz, octaves, WHISTLE_EASE, depth=0.02, per_s=71))
    for start_s, *row in chatter_rows:
        add(song, start_s, chatter(*row))
    direct = gain_of(direct_db) * from_left(song * pan(13.0))
    return direct + gain_of(scattered_db) * banks(song, t60_s=0.28, delay_s=0.0032) * pan(10.0)


def far_birds(db=-62, centre_hz=3500, count=150):
    """More birds buzz and chatter in the far trees, heard only as echo; they nearly fall silent once."""
    # middle_s, spread_s, dropout_db (amplitude of the part of the song that drops out)
    lull = (6.76, 0.98, -1.7)
    song = np.zeros(N)
    for when, pitch, slope, long, size in rng.random((count, 5)):
        u = np.linspace(0, 1, int((0.031 + 0.0588 * long) * SR))
        buzz = .09 * np.sin(2 * np.pi * 115 * np.arange(len(u)) / SR)
        hz = centre_hz * np.exp(.4 * (pitch - .5) + .5 * (slope - .5) * (u - .5) + buzz)
        add(song, when * N / SR, whistle(hz, np.sin(np.pi * u), 6 * size))
    echo = evened(banks(song, t60_s=0.6, delay_s=0.044) * pan(8.2))
    return gain_of(db) * echo * (1 - bell(*lull))


def engine(level_db=-1, unevenness=0.24, jitter=0.027):
    """Uneven firings thud through a far diesel's exhaust pipe."""
    # time_s, firings_per_s, level_db
    course = [(0, 23.7, -37), (0.403, 24.3, -38.5), (.7, 29.2, -64), (1.098, 26.5, -43), (1.6, 25, -41),
              (2.501, 25.7, -43), (3.3, 26.6, -45), (4.102, 30.2, -49.5), (4.8, 28.3, -50),
              (5.399, 29, -50.5), (5.901, 23.6, -49.5), (6.8, 25.5, -46), (7.398, 24.7, -50),
              (8.25, 20.1, -46.5)]
    # exhaust spectrum: hz, level_db
    exhaust = [(25, -66.5), (50, -2), (72, -13), (100, 3.5), (125, -5.5), (150, -5), (200, -23.5),
               (270, -14), (400, -42), (800, -62), (3000, -100)]
    time_s, per_s, db = np.transpose(course)
    turns = np.cumsum(np.interp(TIME, time_s, per_s)) / SR + jitter * wander(20)
    firings = np.diff(np.floor(turns), prepend=0) * (1 + unevenness * wander(30))
    return evened(colour(firings, exhaust)) * gain_of(level_db + np.interp(TIME, time_s, db)) * pan(0.61)


def insects(level_db=-80, swell_db=-1.0, centre_hz=9800, width_hz=290):
    """Many small insects in the grass blur into one faint, shrill band of noise."""
    phase = 2 * np.pi * centre_hz * TIME
    smooth = signal.butter(2, width_hz, fs=SR)
    a, b = signal.lfilter(*smooth, rng.standard_normal((2, 2, N)))
    shrill = evened((a * np.sin(phase) + b * np.cos(phase)) * pan(7.0))
    return gain_of(level_db + swell_db * wander(4.5)) * shrill


def hum():
    """A wavering motor tone from far across the pond."""
    # time_s, pitch_hz, level_db
    course = [(0, 312.7, -69.5), (1, 310.8, -66.5), (3.1, 312.6, -72), (3.599, 310.7, -57.5),
              (4.2, 317.6, -95), (6.3, 308.3, -67.5), (7.0, 312, -68), (7.4, 313.6, -57.5), (7.9, 317, -73)]
    time_s, hz, db = np.transpose(course)
    phase = 2 * np.pi * np.cumsum(np.interp(TIME, time_s, hz) + 1.24 * wander(5.9)) / SR
    return evened(np.sin(phase)) * gain_of(np.interp(TIME, time_s, db) + 2.4 * wander(3.8)) * pan(4.2)


def drone(centre_hz=525, width_hz=45):
    """A fuzzy far drone swells and fades: a tone smeared by random modulation."""
    phase = 2 * np.pi * centre_hz * TIME
    fuzz = wander(2 * width_hz) * np.sin(phase) + wander(2 * width_hz) * np.cos(phase)
    return fuzz * bell(peak_s=4, spread_s=1.7, db=-71.5) * pan(3.6)


def patchy(pair, depth_db):
    """Each part of the spectrum swells and sinks a little on its own."""
    z = signal.stft(pair, nperseg=1024)[2]
    patches = uniform_filter1d(rng.standard_normal(z.shape[1:]), size=9, axis=0)
    patches = uniform_filter1d(patches, size=10, axis=1)
    return signal.istft(z * gain_of(depth_db * patches / patches.std()), nperseg=1024)[1][:, :N]


def outdoors():
    """Low rumble of far, slowly receding traffic under the soft, uneven hiss of the countryside."""
    # noise spectra: hz, level_db
    rumble_spectrum, air_spectrum = [(20, -54), (35, -10), (48, -4.5), (62, -3), (85, 3.5), (120, 1.5),
                                     (160, -9), (220, -11.5), (310, -20.5), (420, -32.5), (800, -40.5),
                                     (4000, -99)], [(200, -6.5), (400, 1.5), (510, 2.5), (630, -1),
                                                     (1000, -2), (1700, 2), (2500, -1.5), (3500, -2),
                                                     (5200, -8.5), (7000, -11), (9200, -14.5),
                                                     (11000, -18.5), (12700, -16), (15800, -18)]
    # hz, left_re_right_db
    air_balance = [(400, 10), (1000, 11.5), (2500, 16.5), (4000, 17), (8000, 26), (15000, 8.5)]
    rumble_db, rumble_fade_db_per_s = -41, 0.98
    air_db, air_fade_db_per_s = -58, 0.25
    mirror_s, mirror_db = 0.004, -10.5  # the pond's surface mirrors the hiss a moment later
    rumble = colour(rng.standard_normal((2, N)), rumble_spectrum)
    rumble = evened(spread(rumble, [(50, 0.33), (300, 1.4)]))
    rumble *= gain_of(rumble_db - rumble_fade_db_per_s * TIME)
    air = from_left(spread(colour(rng.standard_normal((2, N)), air_spectrum), air_balance))
    air = air + gain_of(mirror_db) * np.roll(air, round(mirror_s * SR), axis=1)
    air = evened(patchy(air, depth_db=1.5)) * gain_of(.6 * wander(12))
    return rumble + air * gain_of(air_db - air_fade_db_per_s * TIME)


def scene():
    """The cast, the later sloshing, and everything around the pond."""
    # both tables: peak_s, rise_s, fall_s, churn_db, splash_db, spray_db
    # the net leaves the hands and the legs plunge in
    plunges = [(1.17, 0.0086, 0.22, -54, -55, -58), (1.29, 0.008, 0.02, -48.5, -46, -63),
               (1.36, 0.048, 0.65, -36, -43, -57), (1.476, 0.006, 0.017, -23.5, -40, -52),
               (1.533, 0.012, 0.017, -18.5, -43.5, -55.5), (1.56, 0.037, 0.052, -65, -61, -61),
               (1.645, 0.0051, 0.12, -52, -45, -50), (1.723, .002, 0.054, -31.5, -36, -48),
               (1.94, 0.035, 0.053, -26, -58, -68), (2.05, 0.0098, 0.023, -29, -46, -67),
               (2.385, 0.057, 0.018, -28.5, -40, -64), (2.69, 0.042, 0.1, -57, -43, -67)]
    # later sloshes
    sloshes = [(5.078, 0.021, .035, -49, -52, -80), (5.176, 0.065, 0.11, -50.5, -57.5, -75),
               (5.796, 0.062, 0.042, -64, -45, -57.5), (5.859, 0.0011, 0.0052, -31, -39, -65),
               (6.13, 0.32, 0.16, -54.5, -54, -75), (6.48, 0.13, 0.35, -52, -59.5, -93),
               (7.2, .0015, 0.058, -60, -51.5, -74), (7.245, 0.032, 0.049, -38.5, -47.5, -80),
               (7.35, 0.044, 0.084, -47.5, -59, -76), (7.445, 0.006, 0.042, -49, -54, -77),
               (7.504, .002, .012, -46, -54, -72), (7.57, 0.053, 0.083, -53.5, -54, -70.5),
               (7.642, .005, 0.009, -44, -53, -69), (7.666, 0.0037, 0.02, -44, -55.5, -72)]
    cast = water(np.hypot(surges(plunges), landing()), density_per_s=4200,
                 churn_db=-6.5, splash_db=-4.0, spray_db=2.0, bubble_db=-6.5)
    slosh = water(surges(sloshes), density_per_s=2200,
                  churn_db=-6.5, splash_db=0.0, spray_db=5.5, bubble_db=-1.0)
    pond = cast + slosh + slaps() + gulps() + drips()
    song = birds() + hidden_birds() + far_birds()
    background = engine() + insects() + hum() + drone() + outdoors()
    return sinkers() + pond + mesh() + taps() + song + background


def record(dry):
    """Steep low-pass: the treble ends near 16 kHz."""
    low_pass = signal.firwin(511, 15950, window=("kaiser", 9), fs=SR)
    return signal.oaconvolve(dry, low_pass[None], "same")


dry = scene()
out = record(dry)
transcribe(out)
```